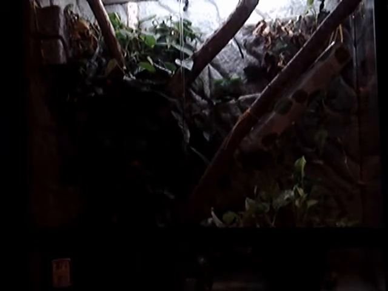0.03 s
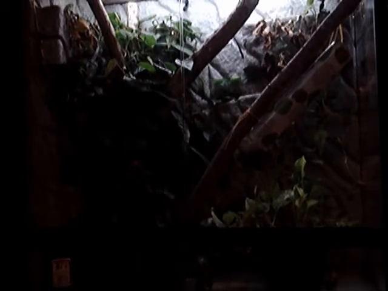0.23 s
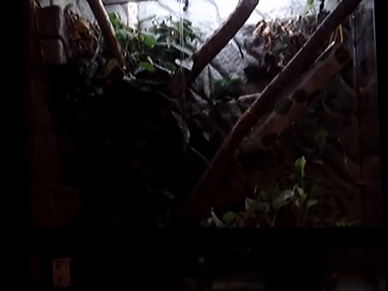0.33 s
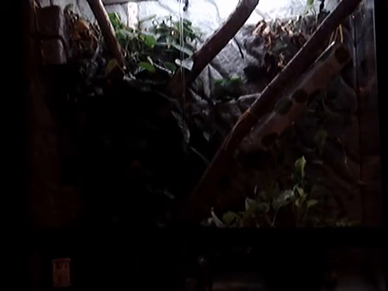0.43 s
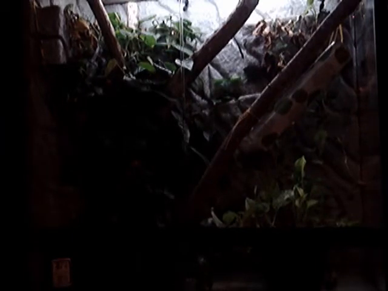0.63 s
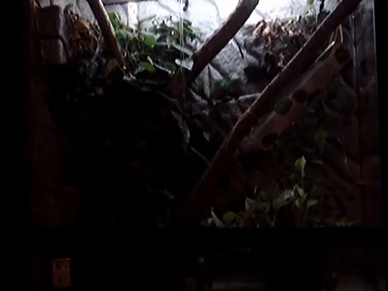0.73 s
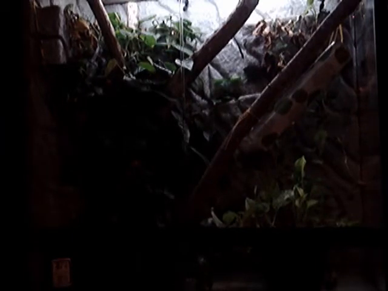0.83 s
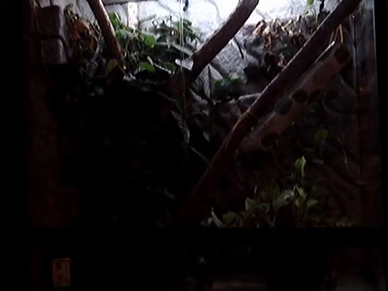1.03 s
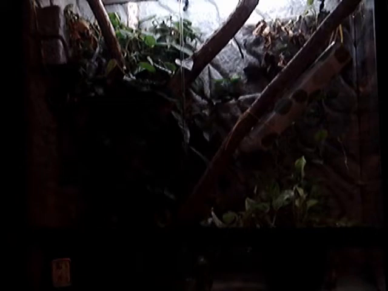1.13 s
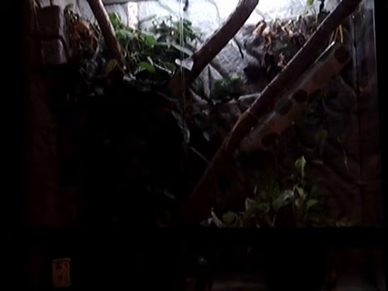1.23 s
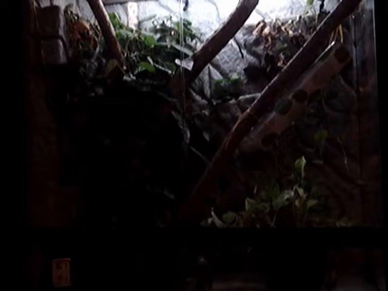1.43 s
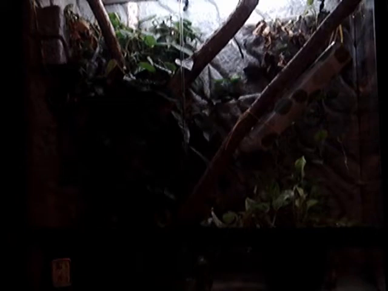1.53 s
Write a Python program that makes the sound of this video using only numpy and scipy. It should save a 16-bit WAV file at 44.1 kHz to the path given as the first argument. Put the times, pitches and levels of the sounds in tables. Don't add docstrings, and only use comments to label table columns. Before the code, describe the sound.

A gecko calls loudly and close inside a glass tank. Crickets trill high and unsteadily from the start over soft room air and faint appliance tones. At 0.2 s comes a short, rough bark, fading by 0.33. At 0.45 a lower, hoarse vowel sinks until 0.6, breaking into creaky snaps that slow and weaken until about 1 s. Short, hollow glass ringing follows; then only crickets and room remain.

```python
import sys
import numpy as np
from scipy import signal
from scipy.fft import rfft, irfft
from scipy.io import wavfile
from scipy.ndimage import uniform_filter1d

SR = 44100
rng = np.random.default_rng(int(sys.argv[2]) if len(sys.argv) > 2 else 0)


def how_loud(loudness_db):
    steps = np.asarray(loudness_db, float) / 20
    return 10 ** steps


def master(y):
    cut = np.clip(np.atleast_2d(y).T, -1, 1)
    pcm = np.round(cut * 32767)
    wavfile.write(sys.argv[1], SR, pcm.astype(np.int16))


N = 70560

# f/Hz, level/dB (per Hz)
AIR = [(40, -13.5), (170, -9), (500, -2.5), (750, -6), (2000, -10), (4000, -11.5), (6000, -10.5),
       (10000, -19.5)]
# f/Hz, width/Hz, level/dB
APPLIANCES = [(168.3, 10, -64.5), (484.7, 9.8, -60.5), (583, 15, -61.5), (1137, 5, -64.5), (1380, 11, -67),
              (2060, 6.3, -66)]
# t/s, level/dB, centre f/Hz
TRILL = [(0, -41.5, 4950), (0.029, -37.5, 4800), (0.241, -45.5, 4850), (.3, -40.5, 4830),
         (0.321, -34.5, 4805), (0.353, -43, 4970), (0.369, -32.5, 4900), (.475, -33.5, 5030),
         (0.491, -45, 4970), (.67, -40.5, 4890), (0.762, -37.5, 4700), (0.941, -42, 4900),
         (1.028, -36, 4818), (1.169, -39, 4750), (1.211, -44.5, 4950), (1.268, -38, 5050),
         (1.539, -40.5, 4850), (1.6, -47, 4930)]
# t/s, level/dB, f/Hz, length/s
NEAR_CHIRPS = [(0.358, -35, 4700, 0.03), (0.41, -29.5, 4820, 0.0037), (0.451, -31, 5120, 0.012),
               (0.47, -35, 5110, 0.0061), (0.686, -37.5, 4550, 0.026), (.757, -38, 4540, .02),
               (0.81, -37, 5100, 0.028), (0.834, -41.5, 4430, 0.025), (0.988, -35, 4620, .018),
               (1.035, -35.5, 4690, 0.035), (1.213, -31, 5160, 0.0042), (1.25, -26.5, 5130, 0.018),
               (1.315, -34.5, 5025, 0.032), (1.386, -32.5, 4920, 0.023)]
# delay/s, gain/1
GLASS_ECHOES = [(.0078, 0.25), (.0165, 0.47)]
# f/Hz, level/dB, t60/s
TANK_MODES = [(308, -1, 0.29), (393.3, 10.5, 0.23), (511, 6, 0.37), (543.4, 5, 0.21), (608.8, 9, 0.25),
              (690, -6.5, 0.14), (857, -11, .2), (1243, -1, .2), (1609.7, 17.5, 0.15), (2080, -11.5, 0.75),
              (2064, -2.5, 0.34), (2230, 9, 0.067), (2347, 11.5, 0.089), (2382, 2, 0.29)]
# f/Hz, width/Hz, then level/dB in bark, in vowel, early in creak, late in creak
THROAT = [(538.6, 194, 2, 6.5, 2.5, 2.5), (852, 365, -15.5, -9, -13, -35), (1183, 230, -13, -11, -51, -45),
          (1590, 110, -13, -17, -20, -17.5), (2230, 314, 1.5, 7.5, 0, 2),
          (2900, 550, -20.5, -16, -19.5, -26), (3675, 300, -51.5, -21, -41, -38),
          (7180, 530, -37.5, -51.5, -49.5, -57.5)]
# t/s, effort level/dB, pitch f/Hz, roughness/0-1, strong-weak beat/0-1
BARK = [
    (.199, -5, 425, .4, 0.4),
    (.212, -13, 423.8, .25, 0.34),
    (.232, -10, 411.8, 0.12, 0.11),
    (.245, -16.5, 409.2, 0.28, 0.1),
    (.265, -19, 411.3, 0.41, 0.79),
    (.292, -24.5, 417.3, 0.36, 0.4),
    (.305, -31, 413, .4, .7),
    (.33, -37, 416, 0, 1),
]
# t/s, effort level/dB, pitch f/Hz, roughness/0-1, strong-weak beat/0-1
VOWEL = [
    (.448, -9, 288.9, 0.31, 0.25),
    (.458, -14, 284.6, 0.31, 0.2),
    (0.466, -12.5, 270.3, 0.1, 0),
    (.506, -16, 270.7, 0.12, 0.19),
    (0.525, -19, 260.2, 0.3, 0.3),
    (.548, -13.5, 253, 0.42, 0.36),
    (0.577, -21.5, 223.3, 0.2, 0.8),
    (.6, -47.5, 191.3, .6, .6),
]
# t/s, snap rate f/Hz
CREAK = [
    (.555, 150),
    (.6, 95),
    (.69, 68),
    (.72, 56),
    (.785, 52),
    (.81, 42),
    (.86, 32),
    (.93, 29),
    (.985, 15),
]
# f/Hz, level/dB
PORT_BALANCE = [(60, 0.), (700, 0.), (1200, -1.3), (3000, -1.3), (5000, -.5), (9000, -.5)]

AIR_DB, AIR_SAME = -51, .93
WHINE_HZ, WHINE_DB = 7870, -67
CHIRPS_PER_S, CHIRP_S, CHIRP_SPREAD_HZ, CHIRP_UNEVEN_DB = 110, .014, 210, 3.5
HAZE_DB, HAZE_HZ, FLUTTER_DB = -2, 520, 2
MODES_DB, TAIL_DB, TAIL_T60_S, DIRECT_DB = -2, -2.5, 0.24, -2
RISE_S, BARK_SHUT_DB, BARK_OPENS_S, CHEST_CUT_HZ = .001, -7, 0.048, 357
CREAK_DB, CREAK_SAG_DB_PER_S, CREAK_UNEVEN_DB, CREAK_SWELL_S = -5.5, -30, 3, 0.032
POUCH_HZ, POUCH_WIDTH_HZ, POUCH_DB = 492, 31.6, 4
PORT_LAG_S, EDGE_HZ, CEILING = .000004, 10150, 1.05
HUSH_DB, HUSH_S, HUSH_BELOW_HZ = -9, .025, 4000
THUMP_DB, THUMP_HZ = -48.5, 200
THIN_HZ, THIN_DB = 7600, -27
CLOCK_HZ, CLOCK_DB = 12090, -44


def evened(x):
    return x / np.sqrt(np.mean(x ** 2) + 1e-20)


def read(points, hz):
    f, value = np.transpose(points)
    return np.interp(np.log(hz + 1), np.log(f + 1), value)


def colour(x, gain):
    return irfft(rfft(x) * gain(np.fft.rfftfreq(N, 1 / SR)), N)


def resonate(x, hz, width, order=1):
    turn = np.exp(2j * np.pi * hz * np.arange(len(x)) / SR)
    r = np.exp(-np.pi * width / SR)
    low = x / turn
    for _ in range(order):
        low = signal.lfilter([1 - r], [1, -r], low)
    return 2 * (turn * low).real


def room():
    t = np.arange(N) / SR
    a, b = colour(rng.standard_normal((2, N)), lambda f: how_loud(read(AIR, f)))
    apart = np.sqrt(np.clip(1 - AIR_SAME, 0, 1) / 2)
    air = how_loud(AIR_DB) * evened(np.array([a + apart * b, a - apart * b]))
    whine = sum(np.sin(2 * np.pi * (WHINE_HZ + off) * t) for off in (-18, 14))
    tones = sum(how_loud(db) * evened(resonate(rng.standard_normal(N), hz, width))
                for hz, width, db in APPLIANCES)
    return air + how_loud(WHINE_DB) * whine + tones


def crickets():
    s, db, hz = np.transpose(TRILL)
    t = np.arange(N) / SR
    starts = rng.random(N) < CHIRPS_PER_S / SR
    size = how_loud(CHIRP_UNEVEN_DB * np.minimum(rng.exponential(1, N), 3)) * starts
    size = size * np.exp(2j * np.pi * rng.random(N))
    kind = rng.integers(0, 24, N)
    chirps = np.zeros(N, complex)
    for k, (off, length, glide) in enumerate(rng.standard_normal((24, 3))):
        u = np.arange(0, 1, 1 / (SR * CHIRP_S * np.exp(.35 * length)))
        pitch_hz = CHIRP_SPREAD_HZ * off + 80 * glide * u
        chirp = np.sin(np.pi * np.sqrt(u)) * np.exp(2j * np.pi * np.cumsum(pitch_hz) / SR)
        chirps += signal.oaconvolve(size * (kind == k), chirp)[:N]
    chirps = chirps / np.sqrt(np.mean(abs(chirps) ** 2))
    a, b = colour(rng.standard_normal((2, N)), lambda f: np.exp(-(f / HAZE_HZ) ** 2))
    haze = (evened(a) + 1j * evened(b)) / np.sqrt(2)
    flutter = how_loud(FLUTTER_DB * evened(uniform_filter1d(rng.standard_normal(N), size=330)))
    centre = np.exp(2j * np.pi * np.cumsum(np.interp(t, s, hz)) / SR)
    trill = (chirps + how_loud(HAZE_DB) * haze) * flutter * centre
    return how_loud(np.interp(t, s, db)) * evened(trill.real)


def near_cricket():
    out = np.zeros(N)
    for s, db, hz, length in NEAR_CHIRPS:
        t = np.arange(0, length, 1 / SR)
        chirp = np.sin(2 * np.pi * hz * t) + .4 * np.sin(2 * np.pi * 1.06 * hz * t)
        out[round(s * SR):][:len(t)] += how_loud(db) * np.sin(np.pi * np.sqrt(t / length)) * chirp
    return out


def tank(x):
    t = np.arange(SR // 2) / SR
    modes = sum(how_loud(db - 60 * t / t60) * np.sin(2 * np.pi * hz * t) for hz, db, t60 in TANK_MODES)
    tail = rng.standard_normal(len(t)) * (t > .004) * how_loud(-60 * t / TAIL_T60_S)
    path = how_loud(MODES_DB) * modes / np.linalg.norm(modes) / 3
    path = path + how_loud(TAIL_DB) * tail / np.linalg.norm(tail)
    path[0] += how_loud(DIRECT_DB)
    for s, gain in GLASS_ECHOES:
        path[round(s * SR)] += gain * how_loud(DIRECT_DB)
    return signal.fftconvolve(x, path)[:N]


def throat(drive, column, low_gain=1):
    out = 0
    for k, row in enumerate(THROAT):
        hz, width = row[:2]
        ring = resonate(drive, hz, 2 * width, order=3)
        gain = (-1) ** k * how_loud(row[column]) * np.sqrt(500 / width)
        out = out + gain * ring * (low_gain if k < 2 else 1)
    return out


def creak():
    s, rate = np.transpose(CREAK)
    t = np.arange(N) / SR
    turns = np.cumsum(np.interp(t, s, rate) * (t > s[0]) * (t < s[-1])) / SR
    snaps = np.diff(np.floor(turns - turns[-1] + .002), prepend=0) > 0
    sag_db = CREAK_SAG_DB_PER_S * (t - s[0]) + CREAK_UNEVEN_DB * rng.standard_normal(N)
    size = np.clip((t - s[0]) / CREAK_SWELL_S, 0, 1) * how_loud(sag_db)
    i = np.arange(60)
    snap = np.exp(-i / 32.0) * (0.26 * rng.standard_normal(60)) + (i == 0)
    drive = signal.oaconvolve(snaps * size, snap)[:N]
    late = np.clip((t - s[0]) / (s[-1] - s[0]), 0, 1)
    sound = throat(drive * (1 - late), column=4) + throat(drive * late, column=5)
    sound = sound + how_loud(POUCH_DB) * resonate(sound, POUCH_HZ, POUCH_WIDTH_HZ)
    return how_loud(CREAK_DB) * sound / abs(sound).max()


def voiced(table, column, jitter, count, shut_db=0):
    s, db, hz, rough, beat = np.transpose(table)
    t = np.arange(N) / SR
    on = (t > s[0]) & (t < s[-1])
    rough = np.clip(np.interp(t, s, rough), 0, 1)
    beat = np.interp(t, s, beat)
    wander, size = evened(uniform_filter1d(rng.standard_normal((2, N)), size=120, axis=1))
    turns = np.cumsum(np.interp(t, s, hz) * (1 + jitter * rough * wander)) / SR
    folds = sum(np.cos(2 * np.pi * k * turns) for k in range(1, 24)) * (1 + .5 * rough * size)
    folds = folds * (1 + 2 * beat * np.cos(np.pi * turns / count) ** 4 - beat)
    puffs = np.exp(-(turns % 1) / .3) * rng.standard_normal(N)
    drive = (1 - rough) * evened(folds) + rough * evened(puffs)
    opening = how_loud(shut_db * np.clip(1 - (t - s[0]) / BARK_OPENS_S, 0, 1))
    sound = throat(drive, column, opening)
    effort = on * np.minimum((t - s[0]) / RISE_S, 1) * how_loud(np.interp(t, s, db))
    return effort * sound / np.sqrt(np.mean(sound[on] ** 2))


def gecko():
    call = voiced(BARK, column=2, jitter=0.05, count=4, shut_db=BARK_SHUT_DB)
    call = call + voiced(VOWEL, column=3, jitter=.04, count=2) + creak()
    return signal.sosfilt(signal.butter(4, CHEST_CUT_HZ, "high", fs=SR, output="sos"), call)


def scene():
    return tank(gecko()) + crickets() + near_cricket() + room()


def low_pass(x):
    return signal.sosfilt(signal.butter(12, 15100, fs=SR, output="sos"), x)


def record(dry):
    side = np.array([[.5], [-.5]])
    t = np.arange(N) / SR

    def ports(f):
        lag = np.exp(2j * np.pi * f * side * PORT_LAG_S)
        return how_loud(side * read(PORT_BALANCE, f)) * lag * (f < EDGE_HZ)

    x = colour(CEILING * np.tanh(dry / CEILING), ports)
    hush = sum((t > s - HUSH_S) & (t < s - .002) for s in (BARK[0][0], VOWEL[0][0]))
    hush = (1 - how_loud(HUSH_DB)) * uniform_filter1d(1. * hush, size=90)
    x = x - colour(x, lambda f: f < HUSH_BELOW_HZ) * hush
    rumble = colour(rng.standard_normal(N), lambda f: (f > 15) * np.exp(-(f / THUMP_HZ) ** 2))
    level = np.sqrt(abs(uniform_filter1d(x.mean(0) ** 2, size=900)))
    thump = how_loud(THUMP_DB) * evened(rumble) * level
    top = colour(x, lambda f: (f > THIN_HZ) * (abs(f - WHINE_HZ) > 120))
    x = x - top * uniform_filter1d(0.61 * (level > how_loud(THIN_DB)), size=1500)
    band = colour(x, lambda f: (f > 1950) * (f < 2450))
    sidebands = how_loud(CLOCK_DB) * band * np.cos(2 * np.pi * CLOCK_HZ * t)
    return low_pass(x + thump + sidebands)


dry = scene()
out = record(dry)
master(out)
```